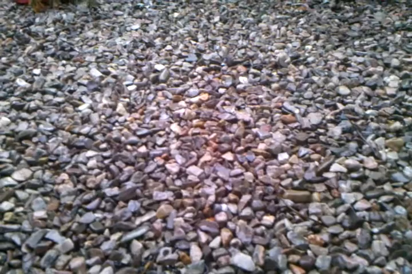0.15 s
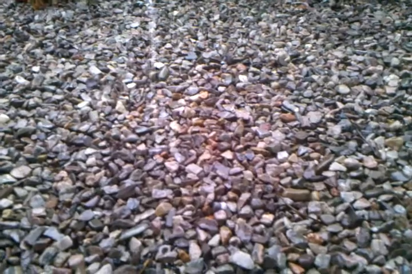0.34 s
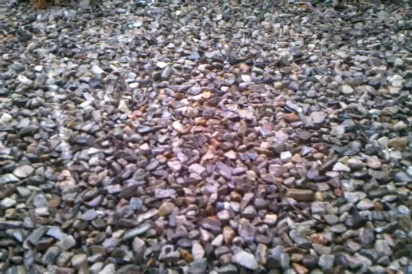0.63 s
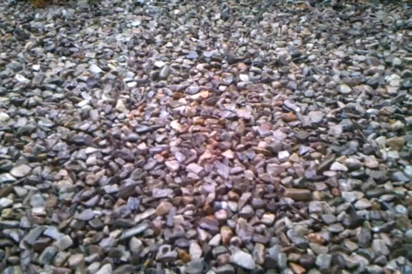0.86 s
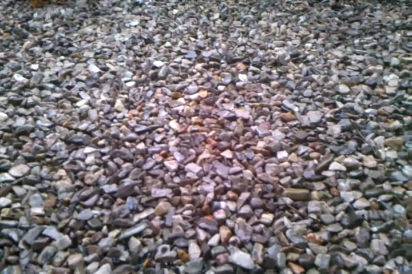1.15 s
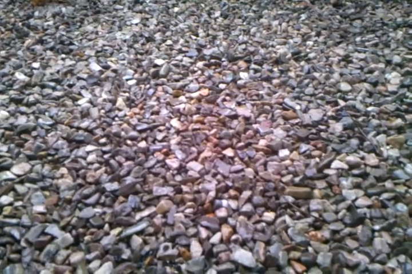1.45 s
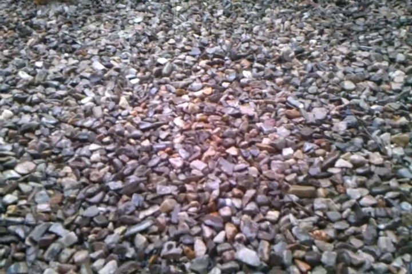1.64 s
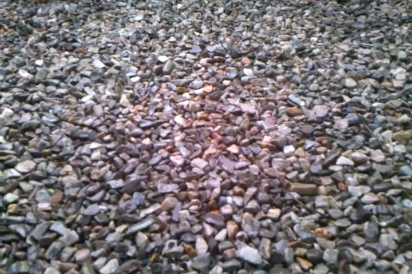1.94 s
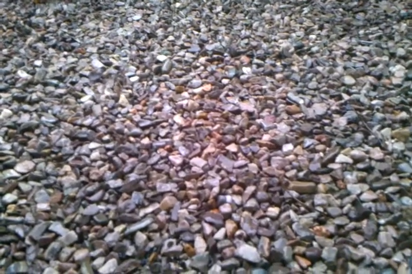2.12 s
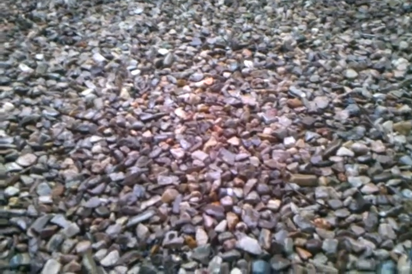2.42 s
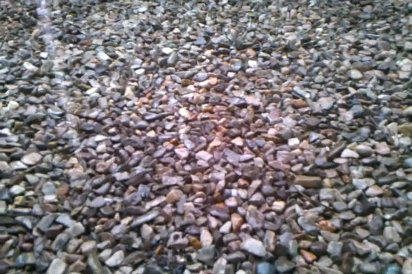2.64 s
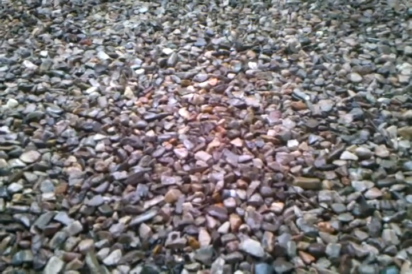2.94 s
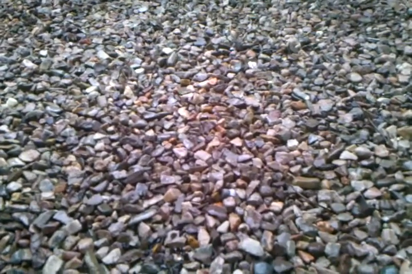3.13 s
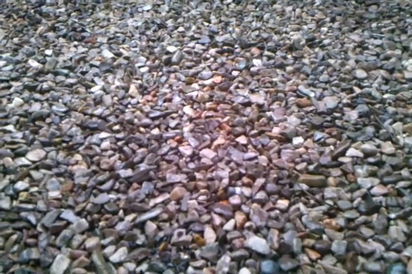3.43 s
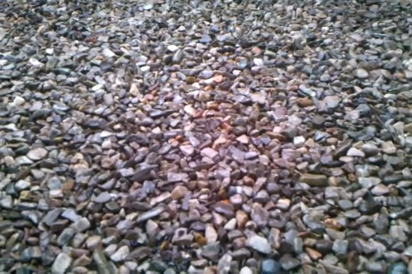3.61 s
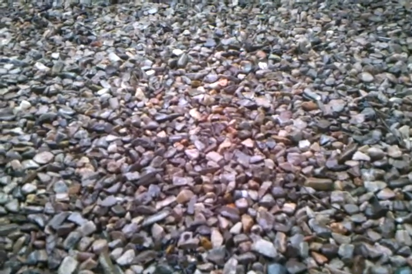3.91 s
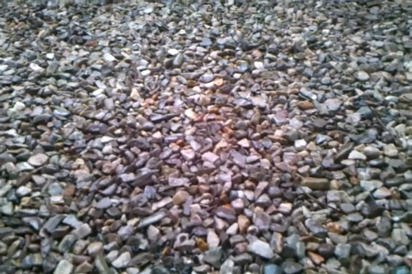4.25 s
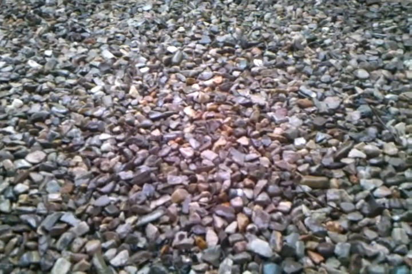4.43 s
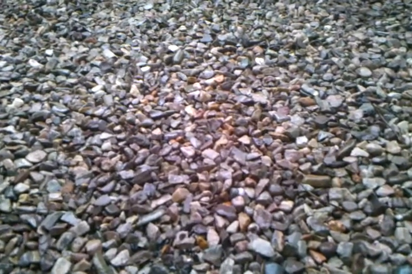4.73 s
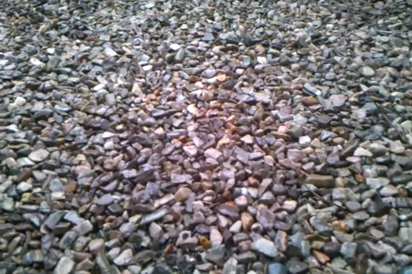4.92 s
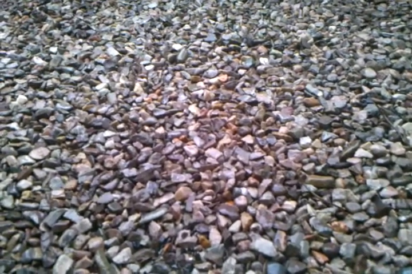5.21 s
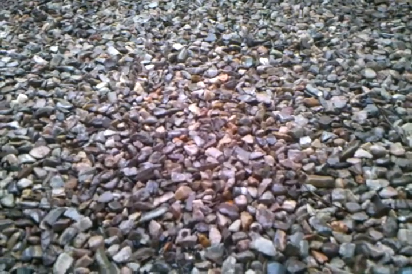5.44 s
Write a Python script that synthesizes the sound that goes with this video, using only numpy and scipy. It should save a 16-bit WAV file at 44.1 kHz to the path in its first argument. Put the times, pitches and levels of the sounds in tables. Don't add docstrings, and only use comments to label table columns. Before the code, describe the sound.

Constant dense rain hiss over pebbles, close and outdoors, without obvious echo. Random fine crackle, short noisy splashes and soft, low bubbly plops ride on top. A few dull thuds come early, two hard bright clicks strike just before three seconds, and after a tiny lull firm drops knock the microphone's casing until the end. The mono pickup is modest, thin in the bass and limited in the highest treble.

```python
import sys
import numpy as np
from scipy import signal
from scipy.fft import rfft, irfft
from scipy.io import wavfile
from scipy.ndimage import uniform_filter1d

SR = 44100
rng = np.random.default_rng(int(sys.argv[2]) if len(sys.argv) > 2 else 0)


def volts(x):
    e = np.asarray(x, float) / 20
    return 10 ** e


def wav_out(sig):
    wavfile.write(sys.argv[1], SR, np.round(np.clip(np.atleast_2d(sig).T, -1, 1) * 32767).astype(np.int16))


N = 245637


def evened(x):
    return x / np.sqrt(np.mean(x ** 2) + 1e-20)


def add(mix, s, sound):
    part = mix[round(s * SR):][:len(sound)]
    part += sound[:len(part)]


def spray(table, width, crest_db):
    out = np.zeros(N)
    t, hz = np.arange(4096) / SR, np.fft.rfftfreq(4096, 1 / SR)
    for s, db, centre_hz, length_s in table:
        noise, lumps = rng.standard_normal((2, 4096))
        colour = np.exp(-0.5 * (np.log((hz + 1) / centre_hz) / width) ** 2)
        clumps = np.exp(0.2 * evened(uniform_filter1d(lumps, size=40)))
        droplets = clumps * irfft(rfft(noise) * colour)
        droplets /= np.sqrt(uniform_filter1d(droplets ** 2, size=300))
        attack = 1 - np.exp(-t / 0.00063)
        fade = np.exp(-(t / max(length_s, 0.002)) ** 2)
        add(out, s, volts(db + crest_db) * attack * fade * droplets)
    return out


# t/s, peak level/dB, centre f/Hz, length/s
SPLASHES = [(0.0246, -22.5, 5560, 0.057), (0.2438, -23.5, 2600, 0.033), (0.409, -22, 4470, 0.012),
            (0.7775, -21.5, 3900, 0.038), (1.1857, -22.5, 6120, 0.025), (1.376, -22.5, 4250, 0.022),
            (1.708, -24, 3700, 0.028), (1.8016, -21, 2750, 0.05), (1.939, -16.5, 6150, 0.012),
            (1.9706, -21.5, 5800, 0.026), (2.1173, -19, 6400, 0.027), (2.484, -27.5, 3060, 0.017),
            (2.6195, -25, 3050, 0.051), (2.6994, -22, 5470, 0.013), (2.958, -24, 6210, 0.022),
            (3.1135, -23, 2680, 0.047), (3.1462, -19, 2680, 0.022), (3.33, -29.5, 3400, 0.024),
            (3.367, -21.5, 4800, 0.032), (3.529, -21.5, 3200, 0.035), (3.5587, -23, 2690, 0.032),
            (3.616, -25.5, 5500, 0.024), (3.71, -20, 6100, 0.026), (3.9868, -25, 3530, 0.037),
            (4.3804, -21, 4960, 0.018), (4.6135, -21, 6190, 0.019), (4.9686, -23, 3520, 0.043),
            (5.1623, -19, 3740, 0.031), (5.407, -25.5, 2500, 0.029), (5.555, -22.5, 3500, 0.024)]


def splashes():
    return spray(SPLASHES, width=0.95, crest_db=-11.0)


# t/s, peak level/dB, centre f/Hz
SPURTS = [(.114, -20.5, 3770), (.131, -22, 3420), (.797, -23, 3850), (.8094, -23, 4100),
          (1.925, -17.5, 6460), (2.13, -30, 2880), (3.1258, -21, 4970), (3.1544, -20, 3760),
          (3.165, -15.5, 3890), (3.282, -25, 4150), (3.3844, -21.5, 4480), (3.4396, -18, 4830),
          (3.54, -23.5, 3020), (3.686, -20, 4890), (3.796, -23, 2820), (3.8591, -21.5, 4200),
          (3.908, -16, 4670), (4.051, -26.5, 5500), (4.142, -22, 4800), (4.226, -23.5, 4350),
          (4.3196, -22, 5200), (5.16, -17, 3300), (5.2455, -20.5, 4200)]
# t/s, peak level/dB, centre f/Hz, length/s
SPATTER = [
    (2.8772, -16, 3900, .0045),
    (2.9237, -10.5, 3800, .005),
    (2.9224, -11.5, 7300, 0.0067),
]
# t/s, peak level/dB, centre f/Hz
FAR_SPURTS = [(.0478, -26.5, 3470), (.3277, -29, 3000), (.3694, -28, 4680), (.4794, -25, 3730),
              (.5192, -22, 4770), (.55, -26, 3840), (.5944, -25.5, 6340), (.6594, -29, 2830),
              (.9794, -22.5, 6550), (1.03, -25.5, 6260), (1.2794, -25, 3970), (1.4694, -36, 2840),
              (1.551, -27, 2490), (1.8194, -26.5, 5530), (1.9894, -27.5, 5350), (2.3094, -22.5, 6330),
              (2.3594, -25, 2510), (2.4733, -25, 3000), (2.5614, -36, 5690), (2.7147, -24.5, 3240),
              (2.7871, -30.5, 4300), (4.415, -25, 3650), (4.4494, -34, 3520), (4.5294, -27.5, 5600),
              (4.662, -26.5, 4200), (4.9994, -24, 6630), (5.0694, -25, 2930), (5.1794, -29, 4090),
              (5.4294, -27, 3750)]


def spurts():
    near = [(*row, 0.0063) for row in SPURTS]
    far = [(*row, 0.008) for row in FAR_SPURTS]
    return spray(near + SPATTER + far, width=0.24, crest_db=-12.0)


# f/Hz, level/dB, length/s, kind (0 thud, 1 knock, 2 click
HOUSING = [(340, -.5, 0.0033, 0), (803, -7, 0.0038, 0), (1440, -0.3, 0.0012, 1), (2500, -3, .0011, 0.75),
           (5900, 1.6, 0.00081, 2)]
# t/s, thud level/dB, knock level/dB, click level/dB, pitch factor of the spot
KNOCKS = [
    (.259, -25, -21, -30, 0.88),
    (.723, -17, -37, -27.5, 1.13),
    (1.333, -26.5, -31, -48, 0.67),
    (3.4633, -21.5, -17, -13, 0.87),
    (4.0455, -18.5, -9, -11, .99),
    (4.709, -30, -34, -39, 1.6),
    (4.893, -23, -18, -11, 1.08),
    (5.2178, -16.5, -29, -34, 1.1),
    (5.4757, -21.5, -16.5, -14.5, 1.05),
]
# t/s, peak level/dB,
# f/Hz, length/s
TICKS = [(.2605, -23.5, 3300, .00094), (.2607, -27, 4700, 0.00086), (.7233, -17, 2380, 0.0027),
         (.7234, -28, 3700, 0.0009), (1.927, -23, 6340, 0.0012), (1.928, -25, 3520, 0.0017),
         (1.976, -26, 5900, .0015), (2.116, -20.5, 6000, .0016), (2.12, -33, 2400, .0017),
         (2.8766, -12, 3900, 0.00089), (2.9225, -5.5, 3600, .001), (2.9226, -16, 6740, 0.00089),
         (3.15, -21, 2500, .0018), (3.281, -24, 4120, .0015), (3.282, -25.5, 6300, 0.0017),
         (3.4635, -9.5, 2820, 0.00064), (3.4634, -17.5, 7060, 0.00089), (4.3205, -27.5, 3560, .004),
         (4.7083, -22, 2550, .0022), (4.0456, -13, 3700, .0008), (4.8931, -17, 4400, .0008),
         (5.4758, -21, 3600, 0.00091)]


def taps():
    blows = list(TICKS)
    for s, *blow_db, spot in KNOCKS:
        for k, (hz, part_db, length_s, kind) in enumerate(HOUSING):
            swing = (-1) ** k
            blows.append((s, part_db + blow_db[int(kind)], swing * hz * spot, length_s / spot))
    out, t = np.zeros(N), np.arange(1024) / SR
    for s, db, hz, length_s in blows:
        u = 2 * t / length_s
        press = np.sqrt(2 * np.e) * u * np.exp(-u ** 2)
        add(out, s, -volts(db) * press * np.sin(2 * np.pi * hz * t))
    return out


def ring(hz, t60, rise_s, glide=0.):
    t = np.arange(2048) / SR
    shape = (1 - np.exp(-t / rise_s)) * volts(-60 * t / max(t60, 1e-4))
    climb = 1 + glide * np.minimum(t / t60, 1)
    return shape / shape.max() * np.sin(2 * np.pi * hz * t * climb)


# t/s, peak level/dB, f/Hz
PLOPS = [(.131, -29, 444), (.239, -24.5, 560), (.577, -20, 720), (.611, -24.5, 543), (.805, -31, 549),
         (.901, -29, 950), (.944, -26, 860), (1.189, -30, 520), (1.277, -24.5, 550), (1.813, -25, 1010),
         (1.896, -28, 735), (2.039, -25, 425), (2.129, -27, 630), (2.615, -25, 600), (2.96, -30, 570),
         (3.107, -27, 820), (3.142, -24, 560), (3.339, -24.5, 1080), (3.631, -31, 1030), (3.798, -27, 825),
         (3.994, -32, 644), (4.028, -21.5, 790), (4.97, -27, 597), (5.038, -24, 567), (5.162, -28, 640),
         (5.382, -26, 552), (5.438, -26, 523), (5.497, -26, 540)]


def plops():
    out = np.zeros(N)
    for s, db, hz in PLOPS:
        add(out, s, volts(db - 4.5) * ring(hz, t60=0.035, rise_s=0.0008, glide=0.033))
    return out


# t/s, level/dB
RAIN = [(0, -40.5), (.8, -39.5), (1.05, -40.5), (1.35, -38), (1.64, -41), (1.78, -39), (2.2, -40),
        (2.84, -40.5), (2.97, -39), (3.04, -43.5), (3.17, -39), (3.5, -39), (4.05, -40), (4.16, -41),
        (4.82, -39.5), (4.94, -41.5), (5.02, -39), (5.57, -39)]


def heaviness(t):
    hiss_db = np.interp(t, *np.transpose(RAIN))
    mean_db = hiss_db.mean()
    low_db = mean_db + 0.84 * (hiss_db - mean_db)
    return hiss_db, low_db


def grains(per_s, spread_db, lo_hz, hi_hz, cycles, count=24):
    lands = rng.random(N) < per_s / SR
    size = volts(spread_db * np.minimum(rng.exponential(1, N), 4.5)) * lands
    size *= rng.choice([-1., 1.], N)
    kind = rng.integers(0, count, N)
    out = np.zeros(N)
    for k, hz in enumerate(np.geomspace(lo_hz, hi_hz, count)):
        tone = ring(hz, cycles / hz, 0.37 / hz, 0.1)
        out += signal.oaconvolve(size * (kind == k), tone)[:N]
    return evened(out)


def near_drops():
    hiss_db, low_db = heaviness(np.arange(N) / SR)
    crackle = volts(hiss_db - 9.0) * grains(1500, 3.1, 1480, 7500, 4.1)
    gurgle = volts(low_db - 5.5) * grains(400, 2.4, 444, 1240, 9.8)
    pings = volts(hiss_db - 12.0) * grains(150, 3.1, 2500, 7000, 16.0, count=16)
    return crackle + gurgle + pings


# f/Hz, level/dB (per Hz)
WASH = [(88, -34), (150, -2), (315, -0.5), (386, -7.5), (431, -2), (573, 1), (1390, -5.5), (1810, -6.5),
        (3150, -10.5), (6500, -12.5), (8450, -41), (14300, -120)]


def wash(patchy_db=1.0, flicker_db=1.32, split_hz=1300):
    frames, hz = N // 128 + 5, np.fft.rfftfreq(512, 1 / SR)
    a, b, patches = rng.standard_normal((frames, 257, 3)).T
    patches = uniform_filter1d(patches, size=8, axis=0)
    patches = evened(uniform_filter1d(patches, size=14, axis=1))
    flicker = evened(uniform_filter1d(rng.standard_normal(frames), size=6))
    hiss_db, low_db = heaviness(np.arange(frames) * 128 / SR)
    treble = (1 / (1 + (split_hz / (hz + 1)) ** 2))[:, None]
    treble_db = hiss_db - hiss_db.mean() + flicker_db * flicker
    swell_db = treble * treble_db + (1 - treble) * (low_db - low_db.mean())
    points = [(np.log(f), db) for f, db in WASH if db > -20]
    colour_db = np.interp(np.log(hz + 1), *np.transpose(points))[:, None]
    spectrum = (a + 1j * b) * volts(colour_db) * volts(swell_db + patchy_db * patches)
    noise = signal.istft(spectrum, nperseg=512, noverlap=384)[1][:N]
    return volts(-34.0) * evened(noise)


def scene():
    rain = splashes() + spurts() + taps() + plops() + near_drops() + wash()
    return rain[None]


def converter(dry):
    sampled = irfft(rfft(dry) * (np.fft.rfftfreq(N, 1 / SR) < 8000), N)
    return sampled * (1 + volts(4.5) * np.cos(2 * np.pi * 16000 * np.arange(N) / SR))


# f/Hz, level/dB
MIC = [(20, -49.5), (50, -32), (80, -12), (140, -1), (300, -1.5), (6300, 1), (6960, -1), (7400, -17),
       (7900, -28.5), (9000, -37), (9400, -74.5)]


def microphone(x):
    hz = abs(np.fft.fftfreq(8192, 1 / SR))
    f, db = np.transpose(MIC)
    gain_db = np.interp(np.log(hz + 1), np.log(f + 1), db)
    log_gain = np.log(volts(gain_db))
    response = np.fft.ifft(np.exp(np.conj(signal.hilbert(log_gain)))).real[:4096]
    return signal.oaconvolve(x, response[None])[:, :N]


def low_pass(x):
    return signal.sosfilt(signal.butter(12, 9260, fs=SR, output="sos"), x)


def record(dry):
    heard = microphone(converter(dry))
    return low_pass(heard)


dry = scene()
out = record(dry)
wav_out(out)
```